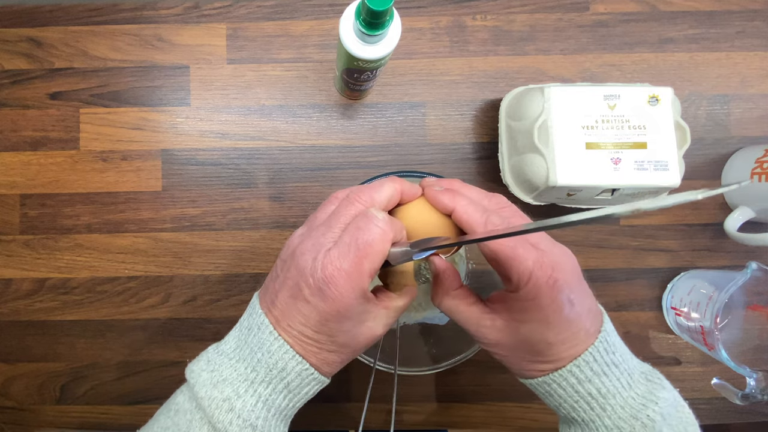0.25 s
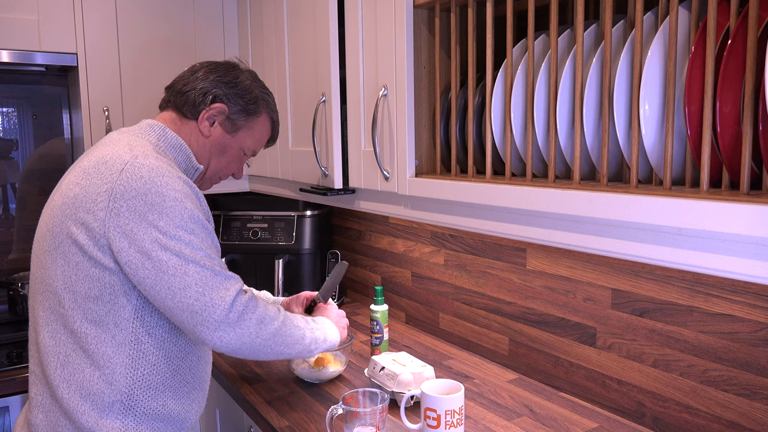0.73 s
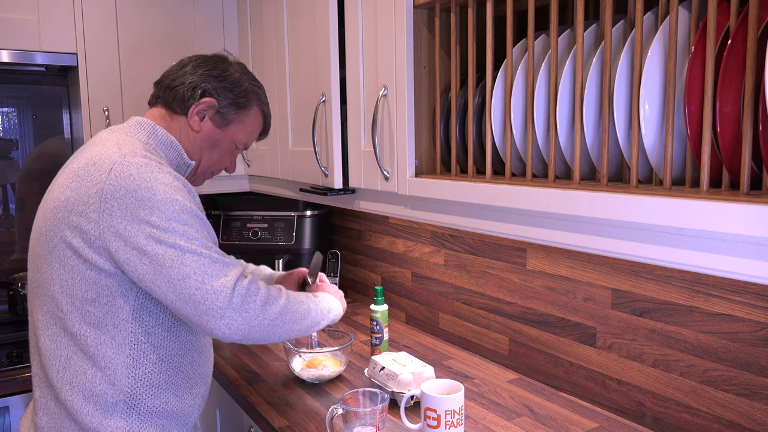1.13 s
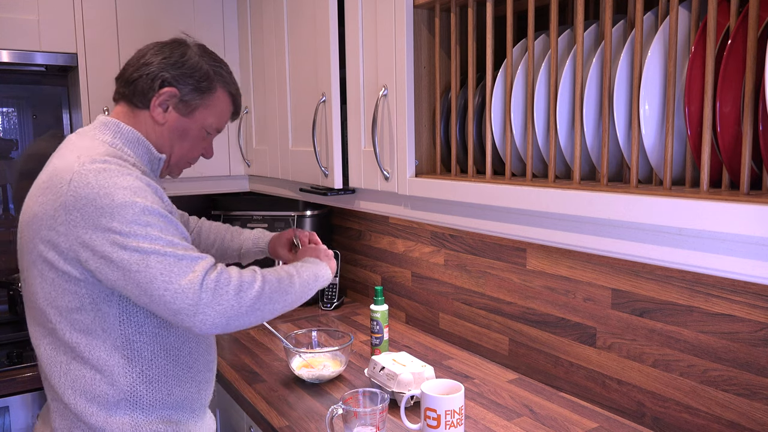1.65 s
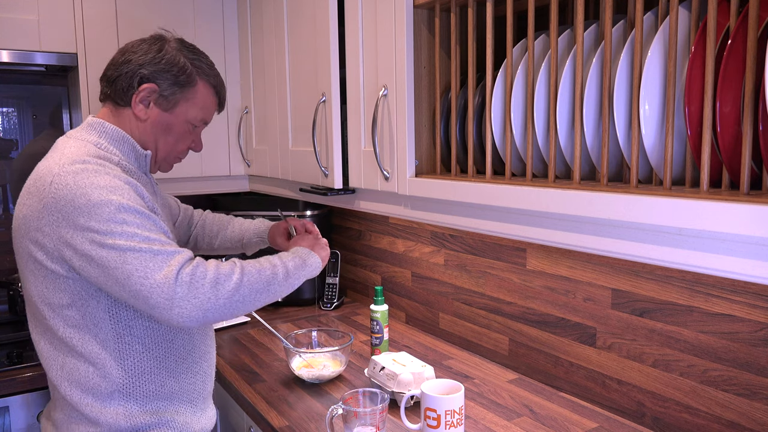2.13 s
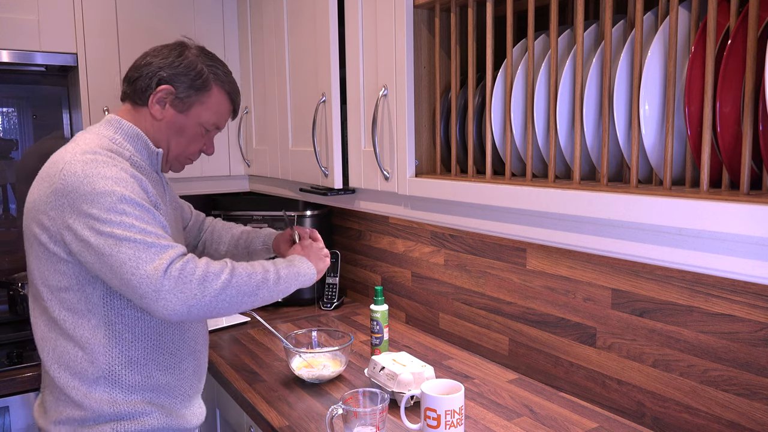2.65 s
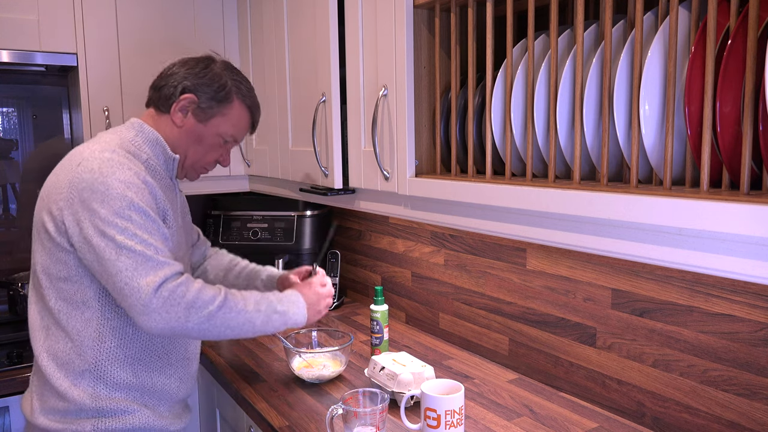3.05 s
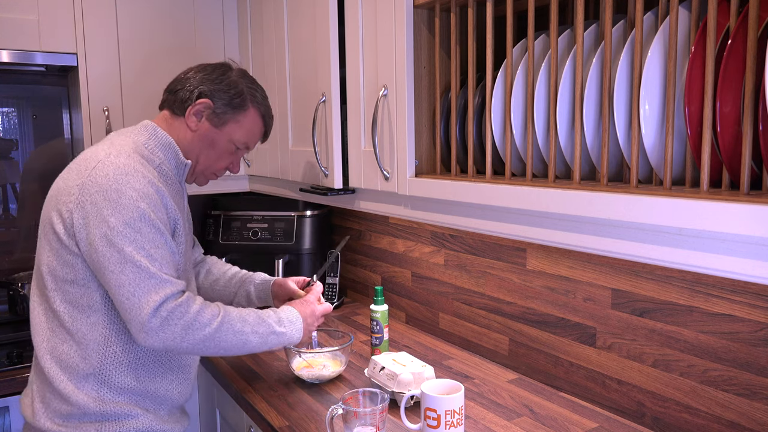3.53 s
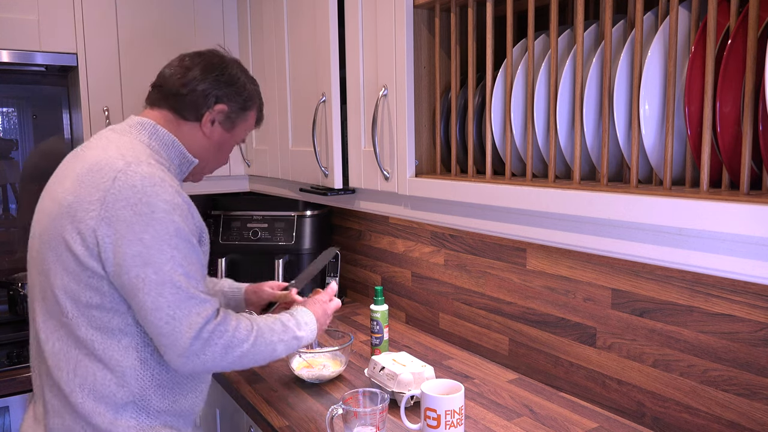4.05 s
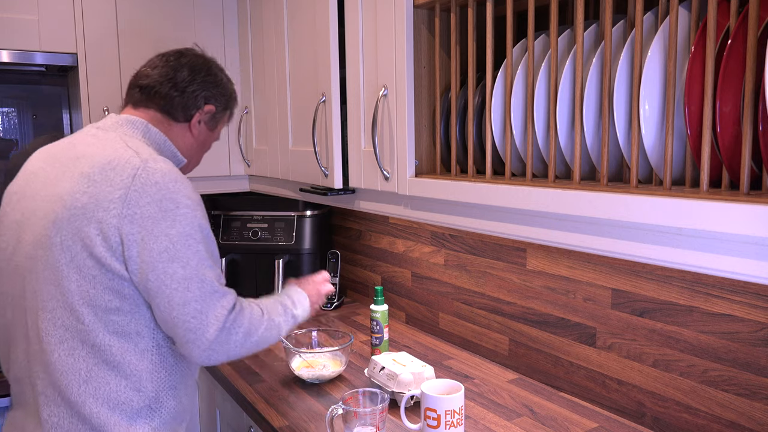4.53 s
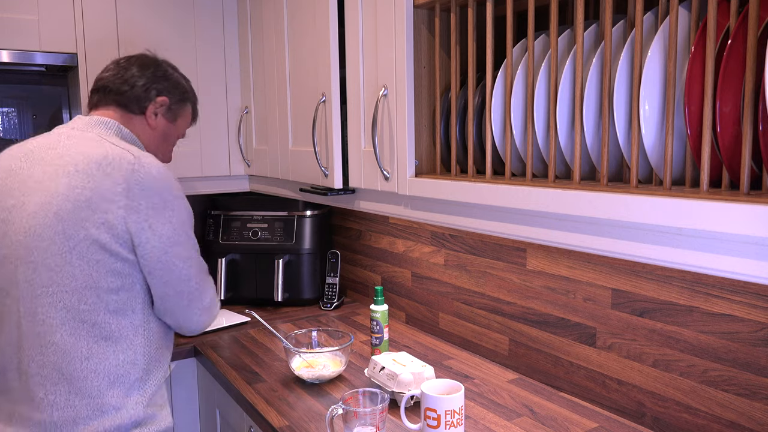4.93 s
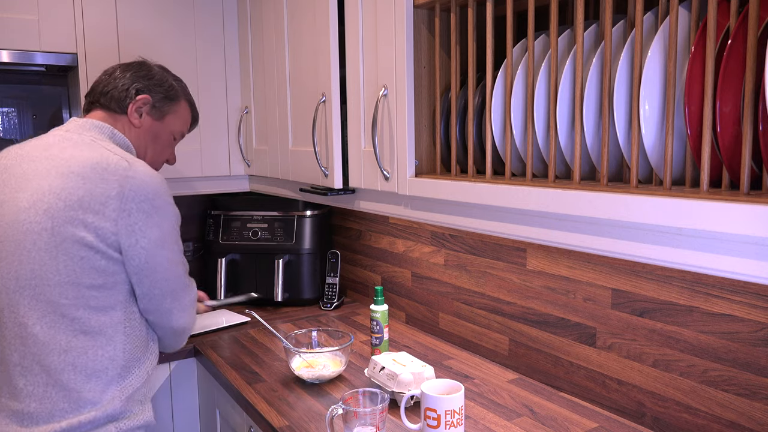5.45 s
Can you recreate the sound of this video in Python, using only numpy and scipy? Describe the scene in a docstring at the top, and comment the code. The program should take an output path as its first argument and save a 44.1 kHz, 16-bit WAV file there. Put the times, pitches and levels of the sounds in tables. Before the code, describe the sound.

In a small, hard, echoing kitchen, a struck glass bowl is already ringing at 0 s and fades within half a second. Faint shell ticks begin around 0.2 s, then a dense brittle crack bursts out at 0.45-0.56 s, loudest at 0.5, with a hollow pop and dull bumps. Smaller snaps and crumbling trail to 0.95. It is then mostly quiet; a soft scrape swells at 1.85-2.05, followed by light worktop clacks at 2.16-2.23. From 2.4 s a very faint motor ticks about 25 times a second. Tiny crackles precede busy, dry shell crunching at 3.15-3.95, with strong snaps near 3.3 and 3.8. Short scrapes and cracks follow at 4.06-4.5. A hard, booming knock lands at 4.6, the loudest set-down; a soft scrape and smaller knocks come at 4.8-5.1, a hollow snap at 5.2 and a faint scrape and tap at 5.5. Low hiss and hum throughout.

```python
"""A glass bowl rings out in a hard, echoing kitchen: narrow noise bands that decay. Hands break an egg shell apart:
noise bursts excite the hollow, wall and crack, then crumbling. A knife scrapes (band-passed grains), things are
set down on the worktop (bursts through resonances) and a faint motor starts to tick. The shell halves are folded
together, then more scrapes and knocks follow. Decaying-noise echoes, mains hum and appliance hiss run throughout."""
import sys
import numpy as np
from scipy import signal
from scipy.fft import rfft, irfft, next_fast_len
from scipy.io import wavfile
from scipy.ndimage import uniform_filter1d

SR = 44100
rng = np.random.default_rng(int(sys.argv[2]) if len(sys.argv) > 2 else 0)


def materialize(psi):
    """Save the field psi as 16-bit PCM at rate SR to the path in sys.argv[1].

    A 1-D psi becomes a single channel; in a 2-D psi each row is a channel.
    """
    bounded = np.clip(np.atleast_2d(psi).T, -1, 1)
    quanta = np.round(bounded * 32767).astype(np.int16)
    wavfile.write(sys.argv[1], SR, quanta)


def linear_from_db(decibels):
    """Turn decibels (scalar or array-like) into linear amplitude factors; 0 gives 1."""
    return 10 ** (np.asarray(decibels, float) / 20)


N = 250488

# shell snaps: time_s, hollow_peak_db, hollow_hz, crack_minus_hollow_db
SNAPS = [(0.226, -57, 1800, 7), (0.276, -50.5, 1620, 1.5), (0.4138, -42, 1430, -2), (0.436, -53, 1500, 1),
         (0.4532, -33.5, 1370, 11), (0.4745, -34.5, 1590, 14), (0.4911, -24, 1590, 10.5),
         (0.5039, -16, 1940, 0.5), (0.5164, -31, 2320, 0), (0.5314, -32, 2100, 13.5),
         (0.5627, -30, 1880, 15), (0.667, -39.5, 1380, 14.5), (0.731, -29, 1460, -4),
         (0.7784, -40.5, 1500, 1), (0.799, -52, 1460, -13), (0.8298, -48, 1540, 14.5),
         (0.889, -42, 1580, -6), (0.9357, -32, 1784, -8.5), (1.473, -49.5, 1890, -12),
         (2.4346, -53.5, 1140, 7.5), (2.677, -55.5, 1770, 15.5), (2.7559, -52, 1700, 8),
         (2.7815, -51, 2110, 7), (3.0241, -52, 1650, 9.5), (3.0885, -57.5, 1100, 14),
         (3.1463, -31, 1580, -6.5), (3.1948, -37.5, 2220, 7), (3.262, -26.5, 1800, 5),
         (3.2984, -19.5, 1800, 8.5), (3.327, -24, 1700, -6), (3.3868, -26, 1730, -7),
         (3.4519, -24, 1570, -6), (3.465, -26.5, 1580, 7), (3.5398, -28, 1780, 1), (3.579, -22, 1800, 3.5),
         (3.6338, -38.5, 1670, 15), (3.7556, -32, 1630, 0.5), (3.7798, -26, 1820, 8),
         (3.805, -17.5, 1600, -0.5), (3.8206, -25, 1660, -12), (3.835, -46, 1530, 13),
         (3.8527, -35.5, 1640, 13), (3.9083, -39, 1600, -5), (3.949, -39, 1650, 5),
         (4.2226, -24.5, 1500, 5), (4.288, -28, 1390, 8.5), (4.364, -37.5, 1530, 11),
         (4.4935, -37, 1360, -2), (4.5151, -37, 1320, -1), (4.575, -56, 1250, 12),
         (5.2153, -25.5, 1200, -7.5), (5.232, -40.5, 1260, 5), (5.255, -38, 1400, -20),
         (5.2824, -65, 1400, -11)]
# spectrum of a bare crack: freq_hz, relative_level_db
CRACK_SPECTRUM = [(60, -86), (150, -17), (600, -22), (1200, -4), (2600, -3), (4600, -4), (5400, -0.5),
                  (6200, -4), (9000, -9), (11000, -13.5), (14000, -9.5), (16000, -31)]
# side level of near sounds and echoes, widest near 8 kHz: freq_hz, side_minus_mid_db
SIDE_LEVEL = [(25, -34), (200, -7.5), (700, -20), (1200, -37.5), (2400, -34), (4800, -33.5), (6200, -10),
              (8100, -0.5), (11000, -6.5), (12500, -25)]


def unit(x):
    """Scale to rms 1."""
    return x / np.sqrt(np.mean(x ** 2) + 1e-20)


def peak(x):
    """Scale to peak 1."""
    return x / np.abs(x).max()


def along(points, hz):
    """Interpolate (Hz, value) points on a log frequency axis."""
    f, v = np.transpose(points)
    return np.interp(np.log(hz + 1), np.log(f + 1), v)


def colour(points):
    """Gain of a (Hz, dB) spectrum."""
    return lambda f: linear_from_db(along(points, f))


def filtered(x, response):
    """Apply a complex response of frequency."""
    m = next_fast_len(x.shape[-1] + 8192)
    spectrum = rfft(x, m) * response(np.fft.rfftfreq(m, 1 / SR))
    return irfft(spectrum, m)[..., :x.shape[-1]]


def modes(table):
    """Causal sum of (Hz, width Hz, dB) resonances of alternating sign."""
    def response(f):
        return sum((-1) ** k * linear_from_db(db) * 1j * f * width / (hz * hz - f * f + 1j * f * width)
                   for k, (hz, width, db) in enumerate(table))
    return response


def steep(hz, width_hz):
    """One resonance applied twice."""
    return lambda f: modes([(hz, width_hz, 0)])(f) ** 2


def ring(x, hz, sharp):
    """One steep resonance, scaled to peak 1."""
    return peak(filtered(x, steep(hz, hz / sharp)))


def gliding(x, centre_hz, steps_hz, sharp):
    """A moving resonance as a cross-fade of fixed ones."""
    fades = [np.interp(centre_hz, steps_hz, row) for row in np.eye(len(steps_hz))]
    return sum(np.sqrt(fade) * unit(filtered(x, steep(hz, hz / sharp)))
               for fade, hz in zip(fades, steps_hz))


def burst(life, rise):
    """A noise spurt of tiny breaks: rise time constant and 60 dB decay in s; flattened spectrum."""
    t = np.arange(4096) / SR
    envelope = linear_from_db(-60 * t / life) * (1 - np.exp(-t / rise)) ** 2
    z = rfft(np.roll(rng.standard_normal(len(t)) * envelope, 64))
    return irfft(z / np.sqrt(uniform_filter1d(np.abs(z) ** 2, size=40)))[64:]


def grit(rate, spread_db):
    """Random clicks, rate a second, of clipped log-normal gain."""
    clicks = rng.standard_normal(N) * (rng.random(N) < rate / SR)
    return clicks * linear_from_db(spread_db * np.clip(rng.standard_normal(N), -2, 2))


def add(track, s, sound):
    """Mix a sound in at time s."""
    track[round(s * SR):][:len(sound)] += sound


def snaps():
    """Each break excites the hollow of the shell, its curved wall and a bare crack."""
    wall_hz, wall_spread_hz, wall_db = 3400, 255, -18.5
    out = np.zeros(N + SR)
    for s, db, hz, crack_db in SNAPS:
        blow = burst(life=0.027, rise=0.007)
        hollow = ring(blow, hz, sharp=3.6)
        wall = ring(blow, wall_hz + wall_spread_hz * rng.standard_normal(), sharp=14)
        crack = peak(filtered(blow, colour(CRACK_SPECTRUM)))
        add(out, s - 0.002, linear_from_db(db) * (hollow + linear_from_db(wall_db) * wall + linear_from_db(crack_db) * crack))
    return out[:N]


def crumble():
    """Every snap sets off small fractures that ring the hollow and die away."""
    after_db, t60_s, crack_db = -23.5, 0.3, 2
    s, db, hz, _ = np.transpose(SNAPS)
    strain = np.bincount(np.round(s * SR).astype(int), linear_from_db(db + after_db), N)
    gain = signal.fftconvolve(strain, linear_from_db(-60 * np.arange(SR) / SR / t60_s))[:N]
    t = np.arange(200) / SR
    spurts = signal.fftconvolve(np.abs(grit(rate=220, spread_db=3)), t * np.exp(-t / 0.0008))[:N]
    breaks = np.abs(spurts) * rng.standard_normal(N)
    centre_hz = np.interp(np.arange(N) / SR, s, hz)
    hollow = gliding(breaks, centre_hz, steps_hz=[1100, 1400, 1635, 2100], sharp=1.37)
    crack = unit(filtered(breaks, colour(CRACK_SPECTRUM)))
    return gain * (hollow + linear_from_db(crack_db) * crack)


def pings():
    """Larger pieces of shell wall spring free, each ringing at one pitch."""
    # freed pieces: time_s, peak_db, pitch_hz
    pieces = [(0.5035, -30.5, 4080), (0.531, -24, 3294), (0.8325, -37.5, 3116), (3.2464, -30, 3390),
              (3.267, -35, 3300), (3.2976, -16, 3310), (3.451, -39, 5500), (3.541, -36, 5460),
              (3.579, -34, 3230), (3.8, -26.5, 5410), (3.8051, -33, 3700), (4.2239, -35.5, 3820),
              (4.226, -55, 5600)]
    out = np.zeros(N + SR)
    for s, db, hz in pieces:
        add(out, s - 0.002, linear_from_db(db) * ring(burst(life=0.02, rise=0.0037), hz, sharp=15.4))
    return out[:N]


def scrape():
    """Blade and shell drag over surfaces: friction grains in a broad band, the level sloping until lift-off."""
    # strokes: start_s, length_s, end_level_db, swell_db (negative fades), centre_hz
    strokes = [(1.847, 0.21, -66.5, 20, 3730), (2.12, 0.11, -52.5, 4.5, 3520), (4.06, 0.12, -48, 10, 3400),
               (4.154, 0.059, -60.5, -8, 3330), (4.28, 0.049, -36, 0, 4100), (4.777, 0.49, -58, 5.5, 3440),
               (5.495, .17, -62.5, 3, 2520)]
    lift_db_per_s, hiss_db, touch_s = 352, -12.5, 0.054
    t, out = np.arange(N) / SR, np.zeros(N)
    grains = grit(rate=7100, spread_db=8.5)
    hiss = unit(filtered(grains, colour([(6000, -77), (8500, 0), (13000, 11), (16000, -40)])))
    for s, length, db, swell_db, hz in strokes:
        press_db = np.minimum(swell_db * ((t - s) / length - 1), -lift_db_per_s * (t - s - length))
        touch = np.clip((t - s) / touch_s, 0, 1)
        rasp = unit(filtered(grains, steep(hz, hz)))
        out += linear_from_db(db + press_db) * touch * (rasp + linear_from_db(hiss_db) * hiss)
    return out


def knocks():
    """Blunt blows clack broadly and ring the worktop; the cupboard below booms, returned apart."""
    # things touching the worktop: time_s, clack_peak_db, brightest_hz, contact_s
    contacts = [(2.16, -37, 3500, 0.025), (2.197, -36, 4600, 0.012), (2.2165, -24, 3480, 0.02),
                (2.227, -23.5, 4100, 0.008), (4.612, -13.5, 3230, 0.01), (4.949, -28, 4160, 0.029),
                (5.062, -33, 3220, 0.015), (5.542, -34.5, 1840, 0.015)]
    # worktop resonances: freq_hz, width_hz, relative_db
    worktop = [(281, 130, -4), (550, 87, -1), (860, 420, -5), (1400, 240, -2)]
    # cupboard resonances: freq_hz, width_hz, relative_db
    cupboard = [(48.8, 4.3, 1.5), (141, 23, -2)]
    thump_db, boom_db, boom_db_per_db = -12.5, -1.5, 2.4  # hard blows boom far more
    out, booms = np.zeros((2, N + SR))
    for s, db, bright_hz, contact_s in contacts:
        blow = np.pad(burst(life=contact_s, rise=contact_s / 25), (0, 16384))
        clack = filtered(ring(blow, bright_hz, sharp=0.97), lambda f: 1 / (1 + 1j * f / 6000) ** 2)
        thump = linear_from_db(thump_db) * peak(filtered(blow, modes(worktop)))
        boom = peak(filtered(np.abs(blow), modes(cupboard)))
        add(out, s - 0.0005, linear_from_db(db) * (clack + thump))
        add(booms, s, linear_from_db(boom_db + boom_db_per_db * db) * boom)
    return out[:N], booms[:N]


def bumps():
    """Dull bumps of hands, yolk and bowl: short bursts through one broad resonance."""
    # bumps: time_s, peak_db, pitch_hz
    touches = [(.494, -36.5, 650), (.532, -34, 715), (0.533, -37, 320), (.776, -42.5, 670),
               (.892, -55, 750), (.795, -46, 304), (3.296, -38.5, 900), (3.799, -48, 766),
               (4.197, -44, 290), (4.299, -41.5, 570), (4.356, -45, 275), (4.849, -51.5, 284),
               (5.219, -46.5, 294)]
    out = np.zeros(N + SR)
    for s, db, hz in touches:
        add(out, s - 0.002, linear_from_db(db) * ring(burst(life=0.024, rise=0.0014), hz, sharp=2.07))
    return out[:N]


def bowl():
    """The bowl, struck just before, rings through the room: each mode a narrow, fluttering, fading band."""
    # bowl modes: pitch_hz, relative_level_db, t60_s
    glass = [(308, -5.5, 0.54), (878, 3, 0.32), (1200, -2, 0.37), (1800, 1.5, 0.41), (2430, -14, 0.67),
             (3224, -1, 0.46), (4800, -2.5, 0.44), (5090, -7.5, 0.39)]
    rings_db, wash_db, wash_t60_s = -44.5, -43, 0.52
    t = np.arange(SR) / SR

    def band(hz):
        return unit(filtered(rng.standard_normal(SR), steep(hz, 90)))

    rings = sum(linear_from_db(db - 60 * t / t60) * band(hz) for hz, db, t60 in glass)
    wash_spectrum = colour([(150, -15), (350, 3.5), (2000, 1.0), (5000, -8.5), (15000, -31)])
    wash = unit(filtered(rng.standard_normal(SR), wash_spectrum))
    return np.pad(linear_from_db(rings_db) * rings + linear_from_db(wash_db - 60 * t / wash_t60_s) * wash, (0, N - SR))


def kitchen(x):
    """Mid and side echoes of decaying noise; the hands move, so every quarter second has its own tail."""
    # decay: freq_hz, t60_s
    decay = [(100, 0.5), (700, 0.46), (2000, 0.39), (5000, 0.39), (12000, 0.19)]
    # room against direct sound: freq_hz, gain_db
    echo = [(50, 13), (200, -0.5), (700, 6.5), (2000, 5), (5000, 3.5), (9000, 3.5), (15000, 6.5)]
    build_up_s = 0.006
    out, step = np.zeros((2, N + 2 * SR)), SR // 4
    for start in range(0, N, step):
        hz, t, z = signal.stft(rng.standard_normal((2, 30000)), SR, nperseg=256)
        fade = linear_from_db(-60 * t / along(decay, hz)[:, None])
        tail = signal.istft(z * fade, SR, nperseg=256)[1]
        tail *= 1 - np.exp(-np.arange(tail.shape[1]) / SR / build_up_s)
        tail /= np.linalg.norm(tail[0])
        wet = signal.fftconvolve(x[None, start:start + step], tail, axes=1)
        out[:, start:][:, :wet.shape[1]] += wet
    mid, side = filtered(out[:, :N], colour(echo))
    return mid, filtered(side, colour(SIDE_LEVEL))


def motor():
    """A small stepping drive fades in, its regular ticks of uneven strength ringing a housing."""
    # housing resonances: freq_hz, width_hz, relative_db
    housing = [(544, 22, 0), (684.4, 25, -1), (1020, 360, -14)]
    from_s, level_db, run_up_s = 2.386, -63, 0.087
    first_tick_s, ticks_per_s, spread_db = 2.3075, 25.26, 1.6
    gain = np.clip((np.arange(N) / SR - from_s) / run_up_s, 0, 1)
    ticks = np.zeros(N)
    times = np.arange(first_tick_s, N / SR - 0.1, 1 / ticks_per_s)
    ticks[np.round(times * SR).astype(int)] = linear_from_db(spread_db * rng.standard_normal(len(times)))
    ticks = signal.fftconvolve(ticks, burst(life=0.018, rise=0.00081))[:N]
    return linear_from_db(level_db) * gain * unit(filtered(ticks, modes(housing)))


def air():
    """Steady room tone as mid and side: appliance hiss with faint patches, and mains hum sines."""
    # hiss spectrum: freq_hz, relative_level_db
    hiss = [(15, -30), (25, -14.5), (60, -0.5), (110, -7.5), (180, -7), (500, -12.5), (1040, -6),
            (1330, -17), (1840, -11), (2550, -15.5), (3340, -19.5), (7920, -20), (11000, -22), (16000, -25)]
    # side level of the hiss, nearly mono at 2-5 kHz and above 12 kHz: freq_hz, side_minus_mid_db
    hiss_side = [(25, -25), (110, -5), (200, -8), (400, -2.5), (800, -10), (1200, -13), (1500, -15),
                 (5000, -38), (5800, 1.5), (8100, -1.5), (11500, 1), (12500, -47)]
    # mains hum: freq_hz, rms_db
    mains = [(52, -87), (100.5, -68), (200, -74)]
    hiss_rms_db, patch_rms_db, hum_side_gain = -58.5, 1.3, 0.076
    z = signal.stft(rng.standard_normal((2, N)), nperseg=512)[2]
    field = uniform_filter1d(rng.standard_normal(z.shape[1:]), size=6, axis=0)
    field = uniform_filter1d(field, size=14, axis=1)
    pair = signal.istft(z * linear_from_db(patch_rms_db * unit(field)), nperseg=512)[1][:, :N]
    mid, side = filtered(pair, lambda f: linear_from_db([along(hiss, f), along(hiss, f) + along(hiss_side, f)]))
    t = np.arange(N) / SR
    hum = sum(linear_from_db(db) * np.sqrt(2) * np.sin(2 * np.pi * hz * t) for hz, db in mains)
    return linear_from_db(hiss_rms_db) * np.array([mid, side]) / np.std(mid) + [hum, hum_side_gain * hum]


def scene():
    """Everything on the worktop, its echo and the room tone, as left and right."""
    clacks, booms = knocks()
    shell = snaps() + crumble()
    rest = pings() + scrape() + clacks + bumps()
    near = shell + rest
    shell_echo_db = -6  # the shell is held up, away from the walls
    echo_mid, echo_side = kitchen(linear_from_db(shell_echo_db) * shell + rest)
    air_mid, air_side = air()
    mid = near + echo_mid + booms + bowl() + motor() + air_mid
    # side: near sound a quarter cycle ahead, with a bowl of its own noise
    lead = filtered(near + bowl(), lambda f: 1j * linear_from_db(along(SIDE_LEVEL, f) + 0.5))
    side = lead + echo_side + air_side
    return np.array([mid + side, mid - side])


def low_pass(x):
    """Removes everything above the highest recorded frequency."""
    return signal.sosfilt(signal.butter(12, 16310, fs=SR, output="sos"), x)


def record(dry):
    """Two microphone ports differ a little in colour."""
    # uneven ports: freq_hz, left_minus_right_db
    balance = [(30, 0), (110, -2), (200, -4), (380, 0), (700, 3), (1200, 0)]
    ports = filtered(dry, lambda f: linear_from_db([along(balance, f) / 2, -along(balance, f) / 2]))
    return low_pass(ports)


dry = scene()
out = record(dry)
materialize(out)
```